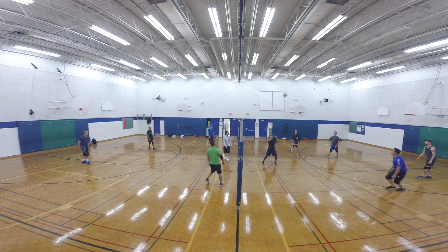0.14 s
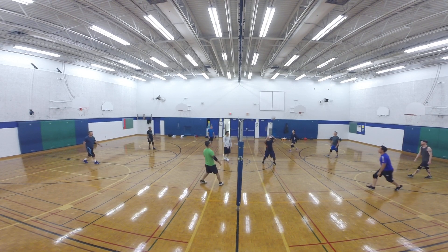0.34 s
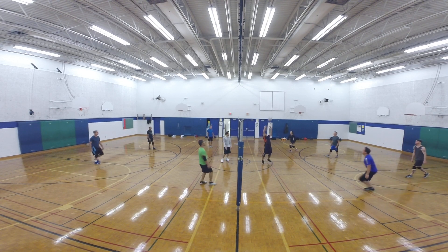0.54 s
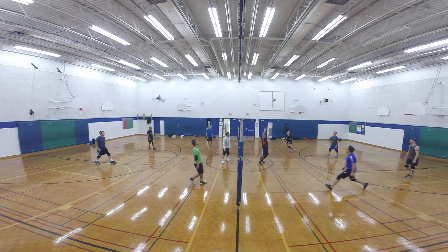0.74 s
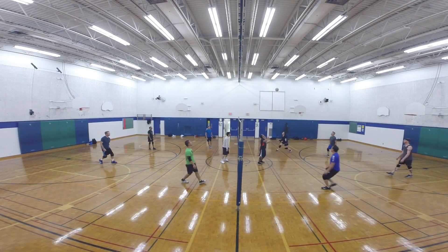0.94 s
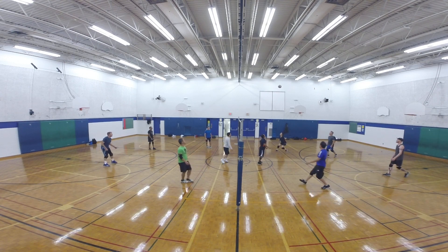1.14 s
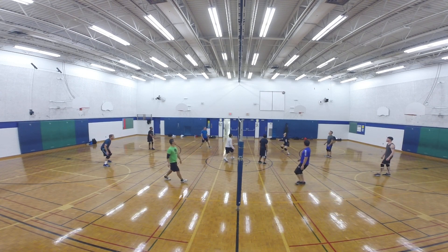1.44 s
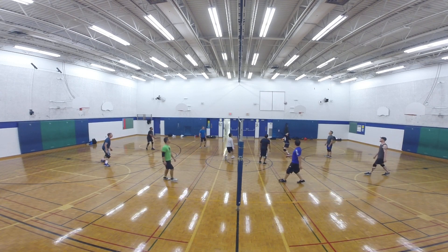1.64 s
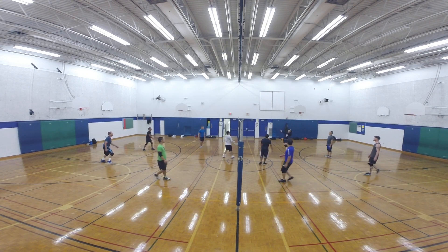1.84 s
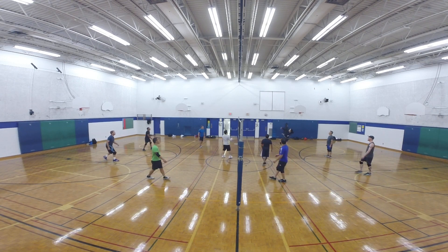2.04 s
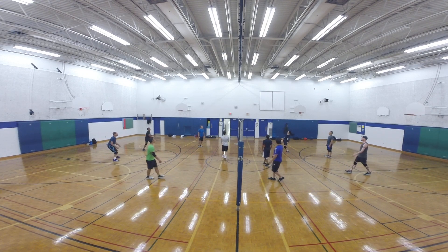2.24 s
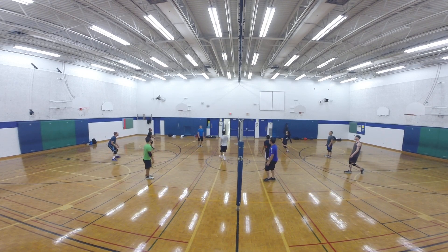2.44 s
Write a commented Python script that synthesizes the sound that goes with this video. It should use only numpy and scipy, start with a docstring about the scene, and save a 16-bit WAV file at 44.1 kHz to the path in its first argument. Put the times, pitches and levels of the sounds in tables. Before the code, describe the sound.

A volleyball is hit twice in a large gym: a dull forearm pass, then a harder hand smack, each with a long echo. Shoes thud and scuff on the wooden court between them, over a low ventilation rumble.

```python
"""A volleyball is hit twice in a large gym: a dull forearm pass, then a harder open-hand smack.
Each hit thumps the ball, rings the air inside it and bounces off floor, ceiling and walls
into a long, fading wash of sound. Shoes thud, tap and scuff on the wooden court, and one
rubber sole squeaks. The ventilation rumbles underneath it all."""
import sys
import numpy as np
from scipy import signal
from scipy.fft import rfft, irfft
from scipy.io import wavfile
from scipy.ndimage import uniform_filter1d

SR = 44100
rng = np.random.default_rng(int(sys.argv[2]) if len(sys.argv) > 2 else 0)


def to_wav(sig):
    """Store sig (one row per channel, or 1-D mono) as 16-bit WAV at the path in sys.argv[1].

    Samples outside -1..1 are clipped; the rate is SR.
    """
    pcm = np.clip(np.atleast_2d(sig), -1, 1) * 32767
    pcm = np.round(pcm).astype(np.int16)
    wavfile.write(sys.argv[1], SR, pcm.T)  # frames by channels


N = 114660  # 2.6 seconds

def undb(db):
    """Turn decibels into a gain."""
    return 10 ** (np.asarray(db) / 20)

def unit(x):
    """Scale to an energy of one."""
    return x / np.sqrt(np.sum(x ** 2))

def along(points, hz):
    """Read between a table's rows, giving each octave equal room."""
    freqs, values = np.array(points, float).T
    return np.interp(np.log(np.maximum(hz, 1)), np.log(freqs), values)

def pulse(colour, size=8192):
    """The shortest click with a given colour (its mix of bass and treble)."""
    gains = undb(along(colour, np.fft.rfftfreq(size, 1 / SR)))
    cepstrum = irfft(np.log(gains))
    cepstrum[1:size // 2] *= 2  # these two lines pack the energy at the start
    cepstrum[size // 2:] = 0
    return unit(irfft(np.exp(rfft(cepstrum))))

def through(x, response):
    """Play a sound through a room's or filter's response."""
    return signal.fftconvolve(x, response)[:N]

def late(x, s):
    """Start a sound s seconds in, padded to the scene's length."""
    return np.pad(x, (max(int(s * SR), 0), N))[:N]

def dull(x, hz):
    """Gently soften everything above hz."""
    return signal.lfilter(*signal.butter(2, hz, fs=SR), x)

def ring(hz, fade_s):
    """One tone that fades by 60 dB in fade_s seconds."""
    t = np.arange(N) / SR
    return unit(np.sin(2 * np.pi * hz * t) * np.exp(-np.log(1000) * t / fade_s))

# The colour of the moving air. Each row: frequency in Hz, relative level in dB.
AIR_COLOUR = [(13, -37), (22, -8), (58, -3), (139, -17), (215, -7), (283, -15), (361, -13), (1160, -20),
              (1260, -24.5), (1520, -25), (1890, -25), (2350, -27.5), (4760, -36), (5170, -40),
              (5920, -39.5), (6600, -40.5), (14500, -56)]

def ventilation(rush_db=-46.5, whistle_db=-74.5, whistle_hz=5940, width_hz=63):
    """The vents fill the hall with a steady rumble, hiss and a faint high whistle."""
    gains = undb(along(AIR_COLOUR, np.fft.rfftfreq(N, 1 / SR)))
    rush = irfft(rfft(rng.standard_normal(N)) * gains, N)
    narrow_band = signal.iirpeak(whistle_hz, whistle_hz / width_hz, fs=SR)
    whistle = signal.lfilter(*narrow_band, rng.standard_normal(N))
    return np.sqrt(N) * (undb(rush_db) * unit(rush) + undb(whistle_db) * unit(whistle))

# The colours of a step's three parts. Each row: frequency in Hz, relative level in dB.
THUD_COLOUR = [(40, -34.5), (130, -1), (220, -10), (500, -21.5), (2000, -63.5), (14000, -110.5)]
TAP_COLOUR = [(100, -7.5), (450, 9.5), (850, 1), (1400, -4.5), (2500, -9.5), (6000, -27), (14000, -70)]
SCUFF_COLOUR = [(300, -20), (1500, -5), (3000, 0), (5500, -4), (7500, -11), (10000, -19), (15000, -40)]
# The steps. Each row: start in seconds, levels of heel thud, sole tap and scuff in dB,
# gain in dB for the sound that comes straight to the ear.
FOOTSTEPS = [(.004, -42, -49.5, -57.5, -20.5), (0.158, -72, -77, -64, -24), (0.79, -41.5, -40.5, -72, -21),
             (.848, -61, -72, -56, -18.5), (0.8876, -43, -40.5, -68, -11.5), (0.9498, -39, -60, -58, -23),
             (1.0391, -65, -57, -60.5, -32), (1.244, -40.5, -52, -60, -19), (1.315, -46, -49, -88, -15),
             (1.46, -41, -65, -59, -20), (1.6081, -40.5, -50.5, -56.5, -20), (1.716, -48.5, -48, -82, -16),
             (1.9142, -53, -83, -59.5, -19)]

def footsteps(settle_s=0.0033):
    """Shoes thud on the springy wooden floor, tap its hollow boards and scuff as they settle."""
    thud = late(pulse(THUD_COLOUR), 0)
    scuff = late(pulse(SCUFF_COLOUR), 0)
    boards = undb(-4) * ring(hz=832, fade_s=0.016)
    tap = unit(late(pulse(TAP_COLOUR), 0) + boards)
    t = np.arange(SR // 10) / SR
    direct, into_hall = 0, 0
    for start, thud_db, tap_db, scuff_db, direct_db in FOOTSTEPS:
        knock = undb(thud_db) * thud + undb(tap_db) * tap
        sole = unit(rng.standard_normal(len(t)) * np.exp(-t / settle_s))
        direct += undb(direct_db) * late(knock + undb(scuff_db) * through(scuff, sole), start)
        into_hall += late(knock + undb(scuff_db) * scuff, start)
    return np.sqrt(SR) * direct + through(into_hall, hall())

# How long the hall rings. Each row: frequency in Hz, seconds to fade by 60 dB.
HALL_FADES = [(60, 3.1), (150, 2.29), (400, 2.3), (1000, 2.42), (2500, 2.64), (4000, 1.6), (6000, 1.1),
              (9000, 0.78), (14000, 0.31)]

def hall(bass_hz=214, bloom_db=1, bloom_s=0.21):
    """The hall's answer to a click: the bass builds up late, and each band fades at its own rate."""
    t, freqs = np.arange(N) / SR, np.fft.rfftfreq(N, 1 / SR)
    noise = rfft(rng.standard_normal(N))
    centres = np.geomspace(80, 16000, 15)  # Hz, about half an octave apart
    wash = 0
    for hz, share in zip(centres, np.eye(len(centres))):
        band = irfft(noise * along(np.c_[centres, share], freqs), N)
        swell = np.sqrt(uniform_filter1d(band ** 2, SR // 10))
        steady = band * band.std() / swell
        build_s = 0.0029 + 0.035 / (1 + (hz / bass_hz) ** 2)
        fade = np.exp(-np.log(1000) * t / along(HALL_FADES, hz))
        wash += steady * (1 - np.exp(-t / build_s)) * fade
    return wash * undb(bloom_db * np.exp(-t / bloom_s))

# The pass, then the smack. Each row: start in seconds, overall gain in dB, gain in dB for the
# direct sound and its echoes, skin crack gain in dB, crack length in seconds.
BALL_HITS = [(.543, -23.5, -23, -12, 0.0035), (2.0229, -17, -25.5, -7, 0.003)]
# The colours of the ball's thump and the skin's crack. Each row: frequency in Hz, relative level in dB.
PASS_THUMP = [(35, -44), (65, -8.5), (110, -6), (150, 5), (200, -2.5), (370, -13), (600, -12.5), (900, -21),
              (1350, -22), (2000, -37.5), (3200, -36), (5500, -42), (9000, -51), (15000, -67)]
SMACK_THUMP = [(35, -25.5), (62, -5), (105, 1.5), (160, 1), (220, -9), (340, -20), (480, -18), (800, -19),
               (1250, -25.5), (1750, -29.5), (2300, -28), (3200, -30), (5500, -37.5), (9000, -45),
               (15000, -66)]
PASS_SKIN = [(300, -12), (900, 3), (1300, -8), (1900, -3), (3200, 0), (3700, -5), (5400, -2), (6500, -9),
             (8000, -12), (15000, -31)]
SMACK_SKIN = [(300, -27), (1150, 19.5), (1500, -12), (2300, -2), (2800, 15), (3600, -1), (4800, 1),
              (7000, -18), (15000, -18)]
# The ball's ringing tones. Each row: pitch in Hz, level in dB against the thump, seconds to fade 60 dB.
PASS_TONES = [(307, -24, 0.24), (464, -23.5, 0.084), (834, -15.5, 0.074), (940, -20, 0.078)]
SMACK_TONES = [(104.5, -10, 0.083), (332, -18, 0.055), (1004, -15.5, 0.057), (1069, -21, 0.14),
               (1312, -25.5, 0.084)]
# Separate echoes off the room. Each row: delay in seconds, gain in dB before the echo is dulled.
PASS_REFLECTIONS = [(.0065, 10), (0.0092, 7.5), (0.0219, 1), (0.035, 1), (0.054, 8.5), (0.06, 7.5),
                    (0.071, 1), (.117, 2.5), (0.1974, 4.5), (.353, -2), (.412, -0.5)]
SMACK_REFLECTIONS = [(.008, 5), (.0425, -12), (.058, 10), (0.0905, 2.5), (0.139, 6.5), (0.169, 3.5),
                     (.199, 3), (0.2338, 7.5), (.322, 3.5)]

def ball(hit, thump_colour, skin_colour, tones, echoes):
    """The struck ball thumps and rings as skin cracks on it; ceiling and walls send back dull echoes."""
    start, level_db, direct_db, crack_db, crack_s = hit
    t = np.arange(N) / SR
    thump = late(pulse(thump_colour), 0)
    for hz, tone_db, fade_s in tones:
        thump += undb(tone_db) * ring(hz, fade_s)
    skin = pulse(skin_colour)
    contact = (1 - np.exp(-t / 0.0004)) * np.exp(-t / 0.0054) * (t < crack_s)
    # The nearby floor and players scatter the crack a moment later.
    scatter = late(unit(rng.standard_normal(N) * np.exp(-t / 0.0067)), s=0.0094)
    crack = unit(through(rng.standard_normal(N) * contact, skin))
    crack += undb(-10) * through(scatter, skin)
    bounces = 0
    for delay, echo_db in echoes:
        smeared_click = (t == 0) + 0.06 * rng.standard_normal(N) * np.exp(-t / 0.0031)
        bounces += undb(echo_db) * late(smeared_click, delay)
    body = dull(thump, hz=1180)  # the ball's body gives off little treble
    early = body + undb(crack_db) * crack + dull(through(thump, bounces), hz=362)
    return undb(level_db) * late(undb(direct_db) * np.sqrt(SR) * early + through(thump, hall()), start)

def squeak(start_s=1.606, length_s=0.079, pitch_hz=8050):
    """A rubber sole sticks and slips in a brief, high, chattering chirp."""
    t = np.arange(N) / SR
    waver, chatter = uniform_filter1d(rng.standard_normal((2, N)), size=110)
    hz = pitch_hz * (1 + 0.011 * waver / waver.std())
    tone = np.sin(2 * np.pi * np.cumsum(hz) / SR)
    fade = np.sqrt(np.maximum(1 - t / length_s, 0))
    grip = np.exp(0.55 * chatter / chatter.std())
    chirp = unit(tone * fade * grip)
    direct = undb(-13) * np.sqrt(SR) * chirp
    return undb(-58) * late(direct + through(chirp, hall()), start_s)

def scene():
    """Both hits, the shoes and the ventilation, added into one channel."""
    forearm_pass = ball(BALL_HITS[0], PASS_THUMP, PASS_SKIN, PASS_TONES, PASS_REFLECTIONS)
    smack = ball(BALL_HITS[1], SMACK_THUMP, SMACK_SKIN, SMACK_TONES, SMACK_REFLECTIONS)
    return (forearm_pass + smack + footsteps() + squeak() + ventilation())[None]

def record(dry):
    """The very highest treble is cut off steeply."""
    top_hz = 15150
    return signal.sosfilt(signal.ellip(10, 0.2, 80, top_hz, fs=SR, output="sos"), dry)

dry = scene()
out = record(dry)
to_wav(out)
```